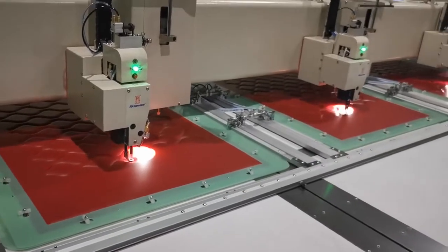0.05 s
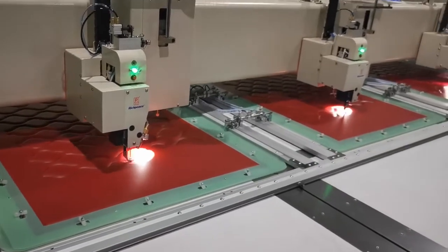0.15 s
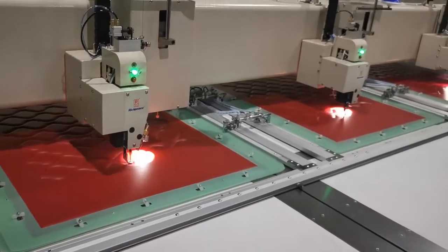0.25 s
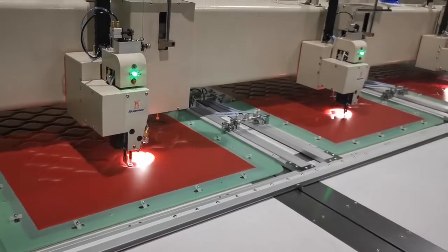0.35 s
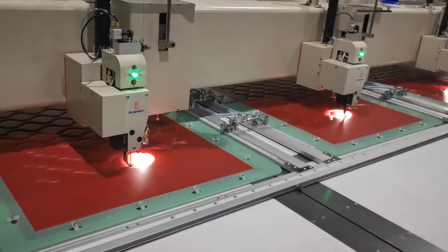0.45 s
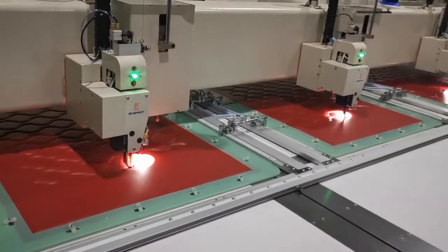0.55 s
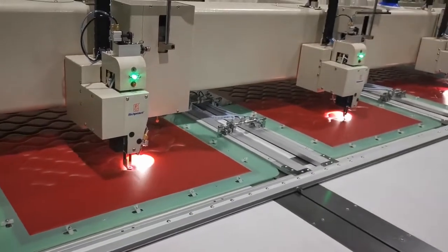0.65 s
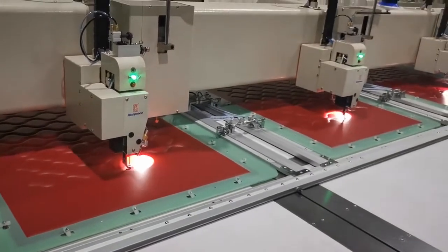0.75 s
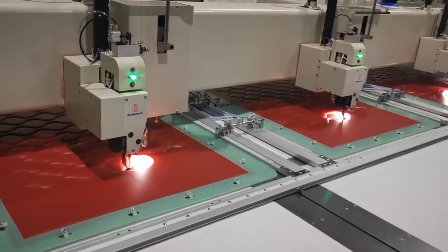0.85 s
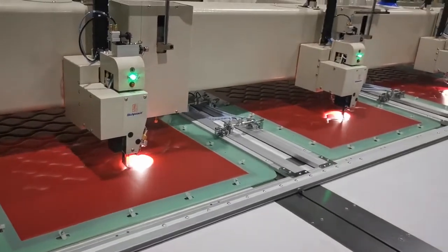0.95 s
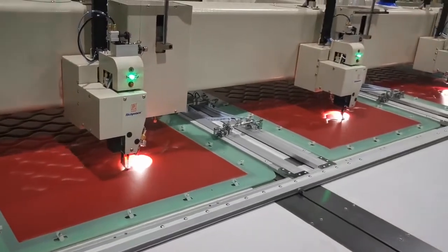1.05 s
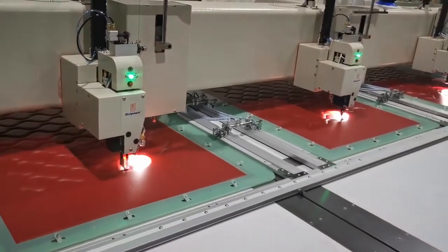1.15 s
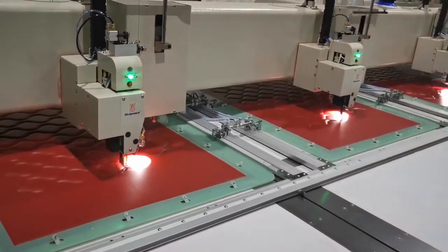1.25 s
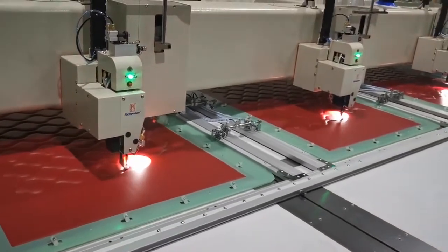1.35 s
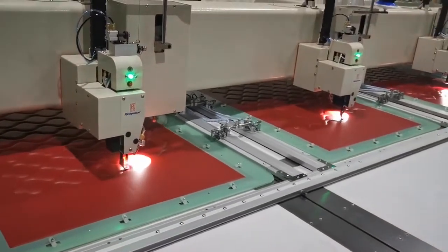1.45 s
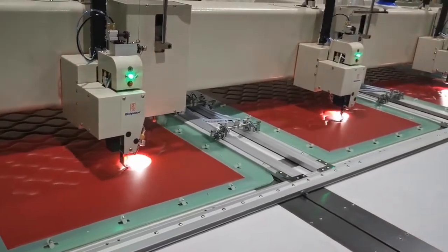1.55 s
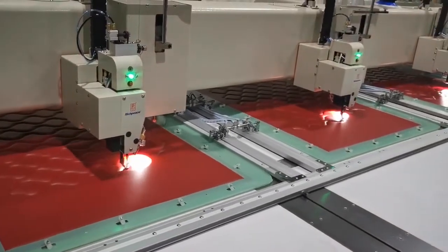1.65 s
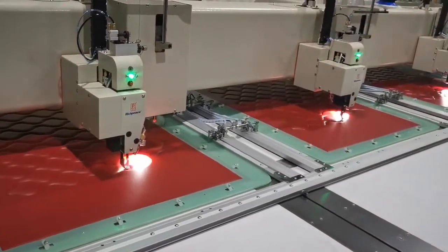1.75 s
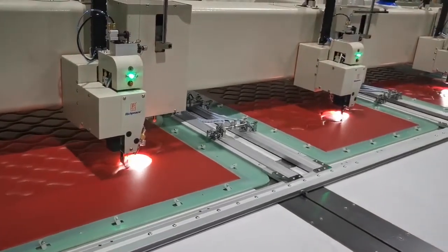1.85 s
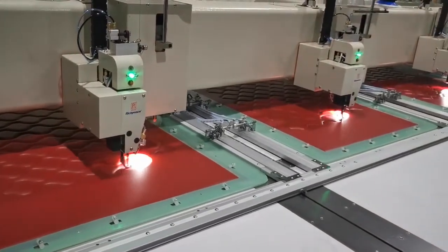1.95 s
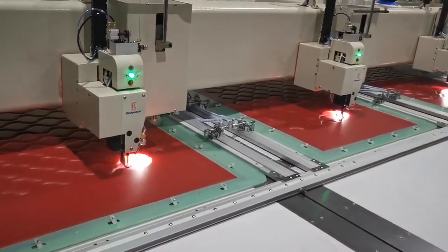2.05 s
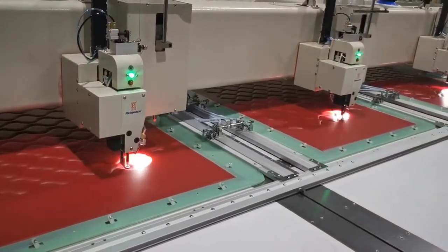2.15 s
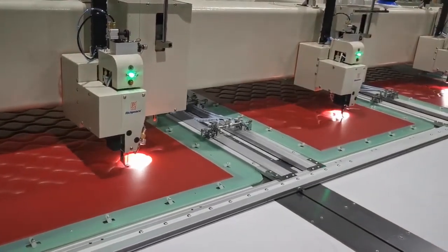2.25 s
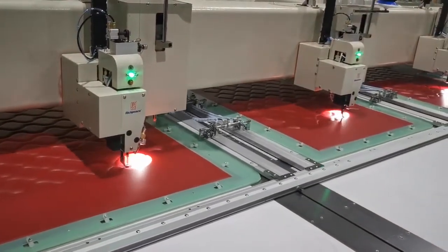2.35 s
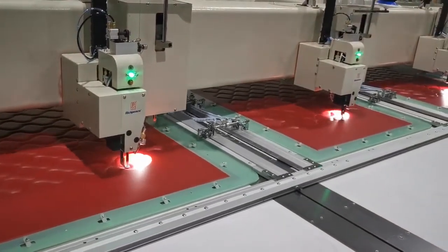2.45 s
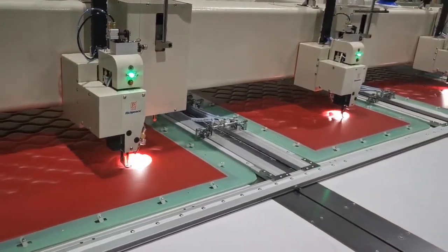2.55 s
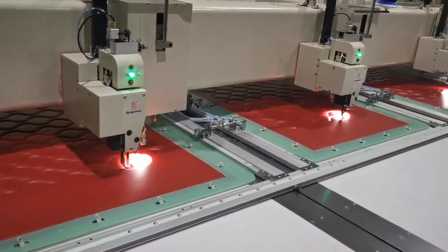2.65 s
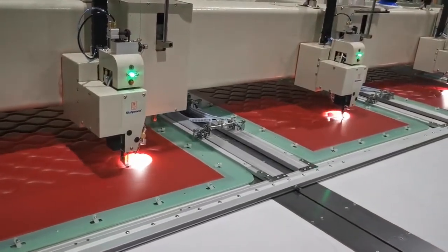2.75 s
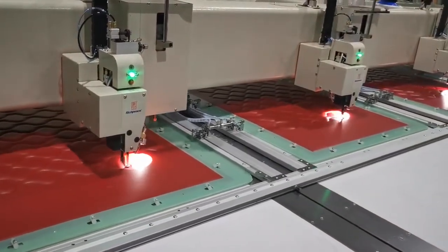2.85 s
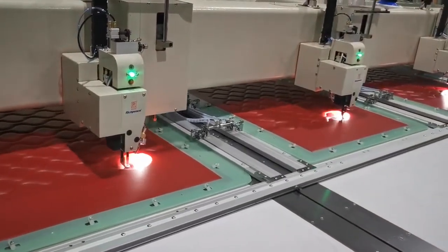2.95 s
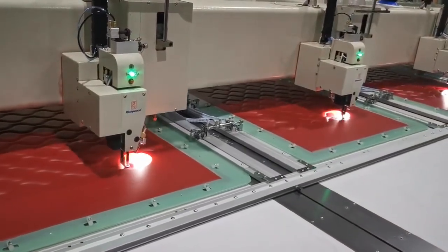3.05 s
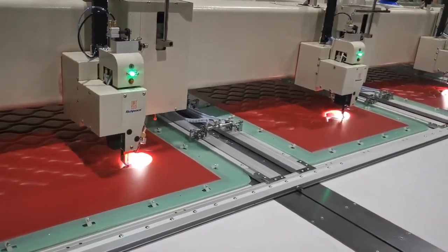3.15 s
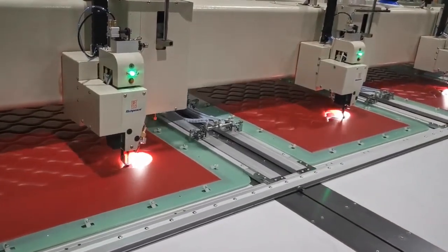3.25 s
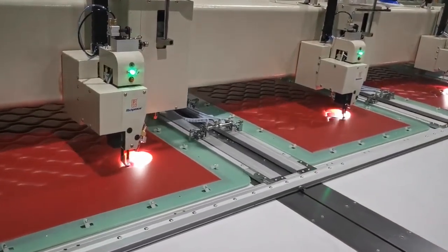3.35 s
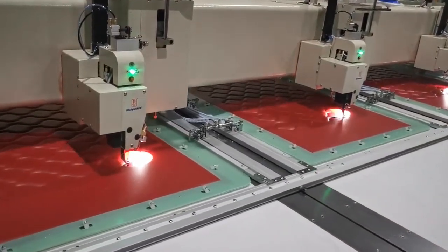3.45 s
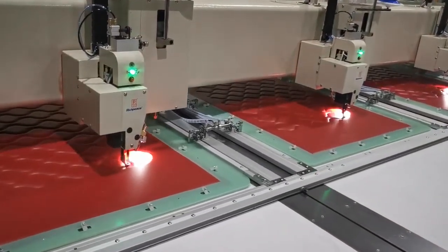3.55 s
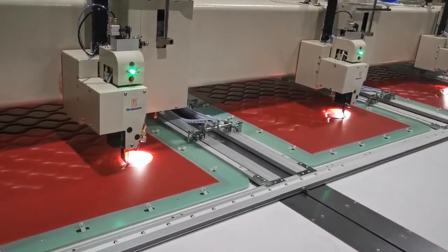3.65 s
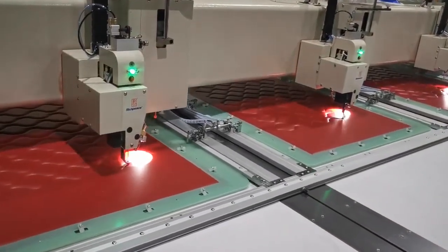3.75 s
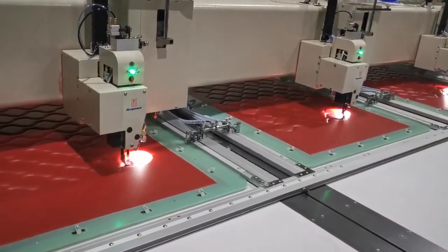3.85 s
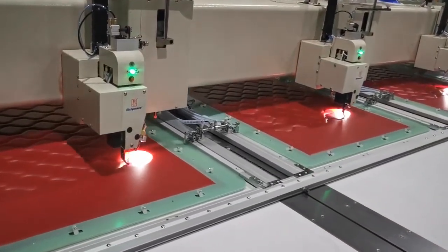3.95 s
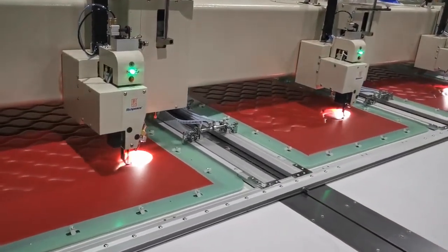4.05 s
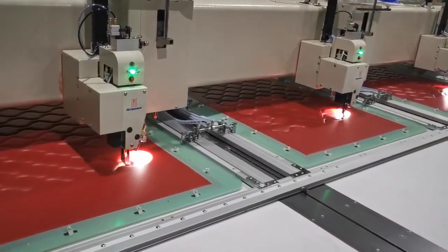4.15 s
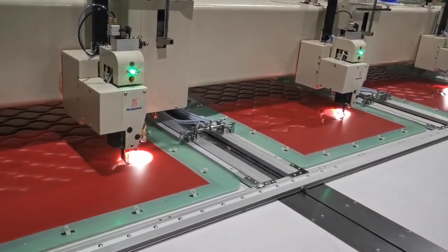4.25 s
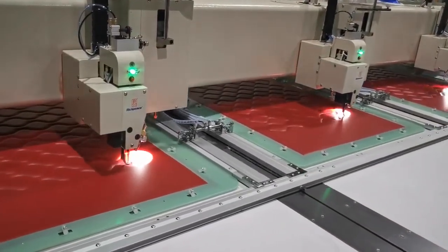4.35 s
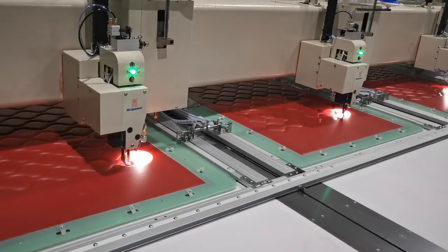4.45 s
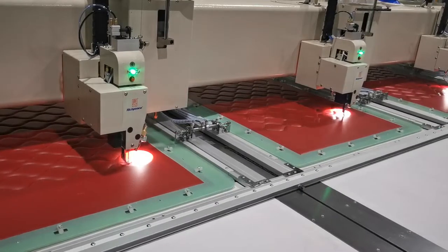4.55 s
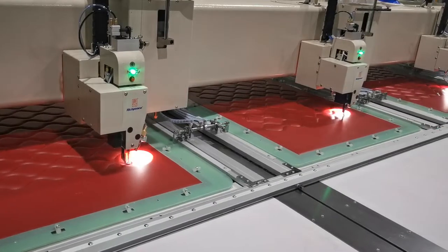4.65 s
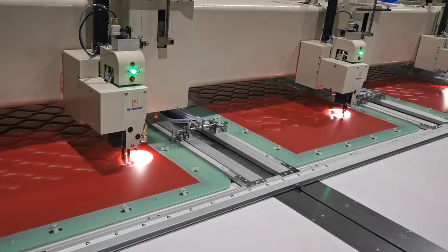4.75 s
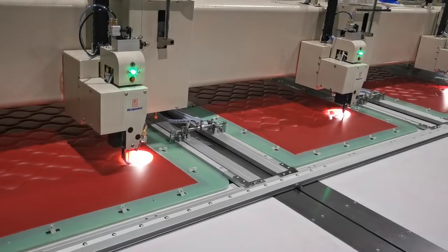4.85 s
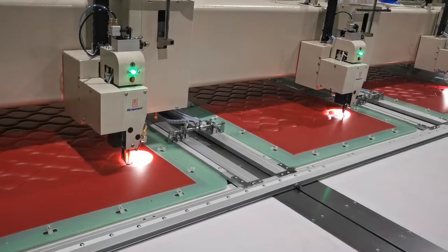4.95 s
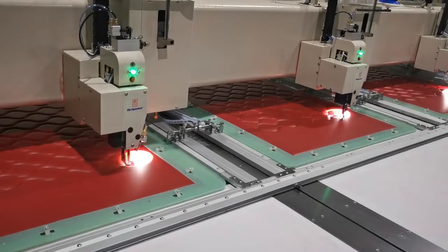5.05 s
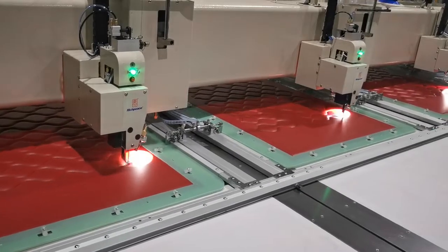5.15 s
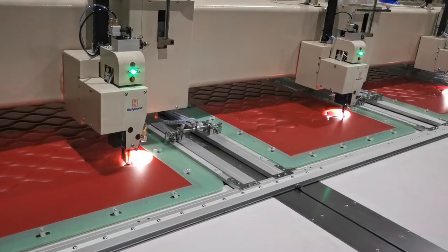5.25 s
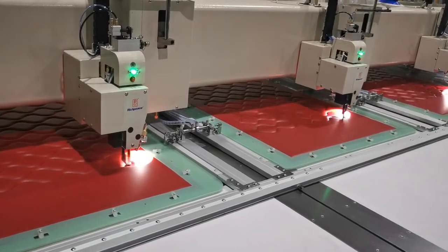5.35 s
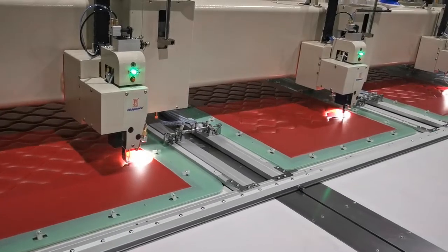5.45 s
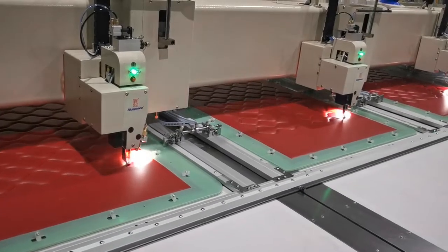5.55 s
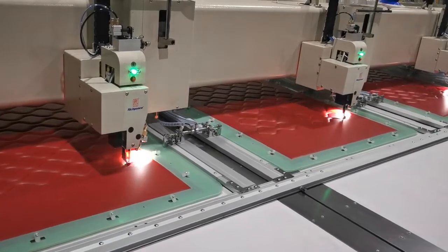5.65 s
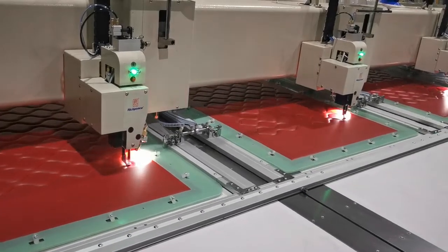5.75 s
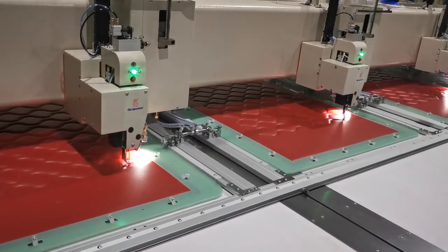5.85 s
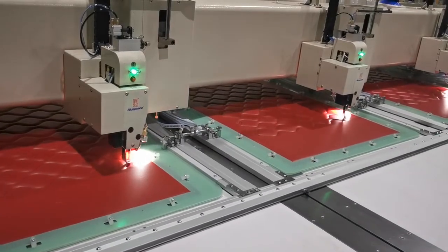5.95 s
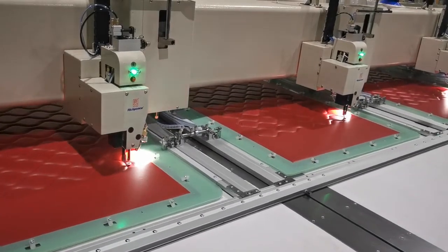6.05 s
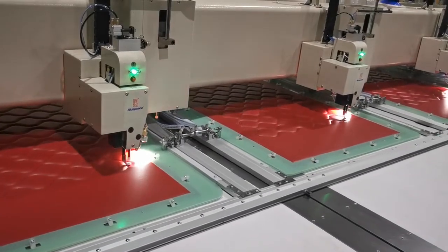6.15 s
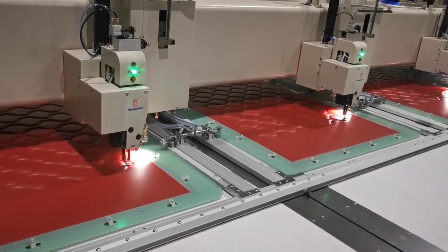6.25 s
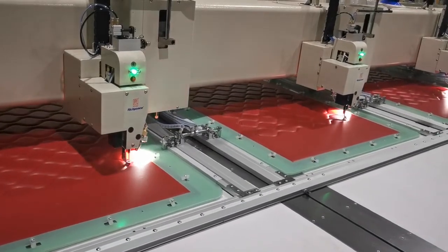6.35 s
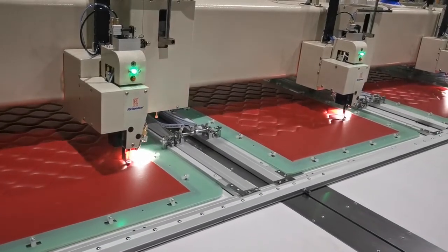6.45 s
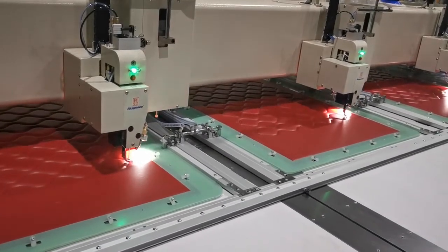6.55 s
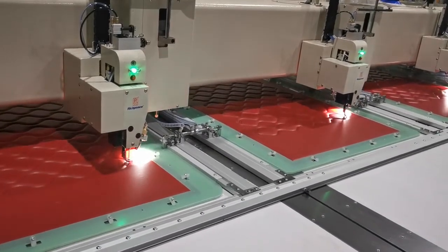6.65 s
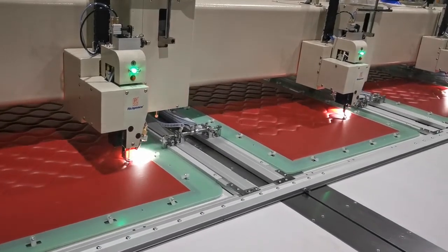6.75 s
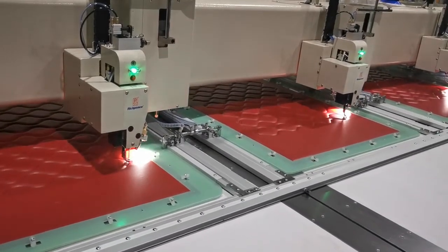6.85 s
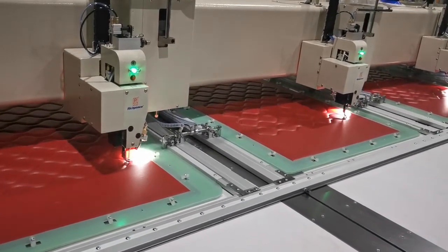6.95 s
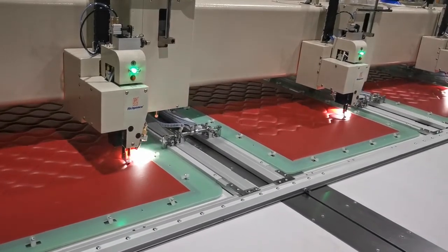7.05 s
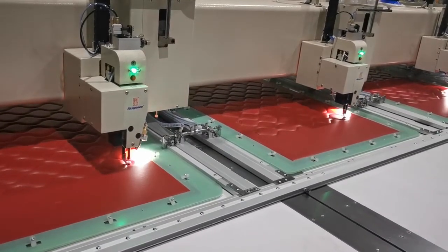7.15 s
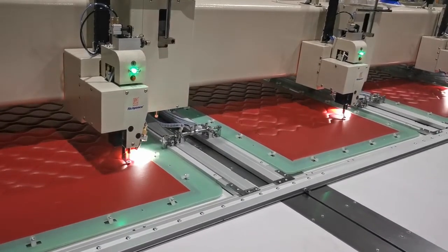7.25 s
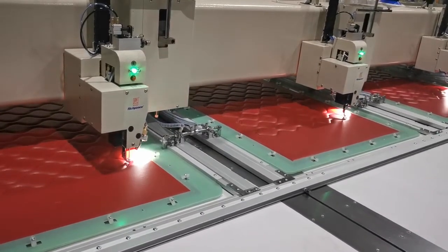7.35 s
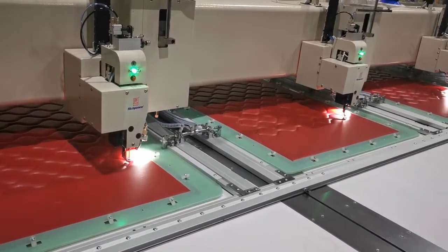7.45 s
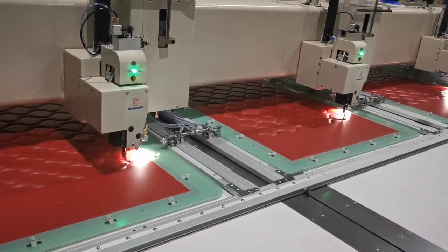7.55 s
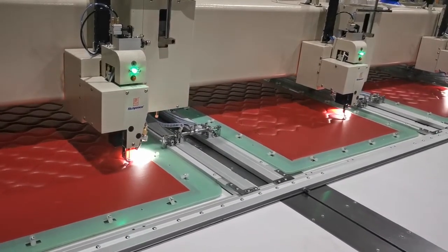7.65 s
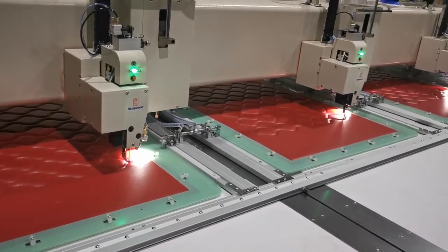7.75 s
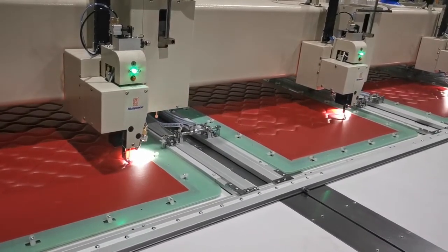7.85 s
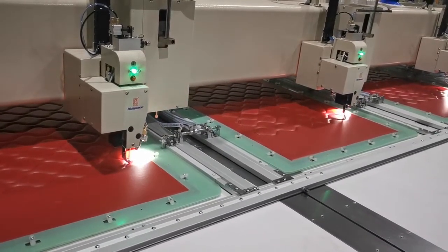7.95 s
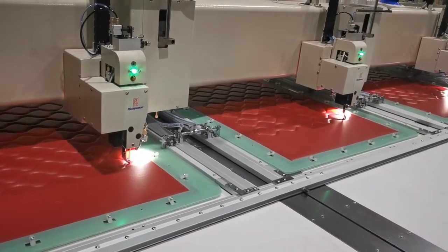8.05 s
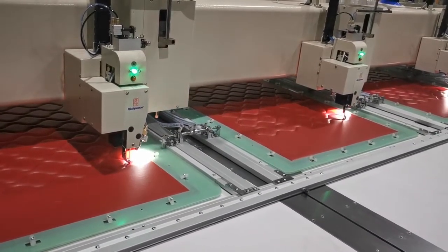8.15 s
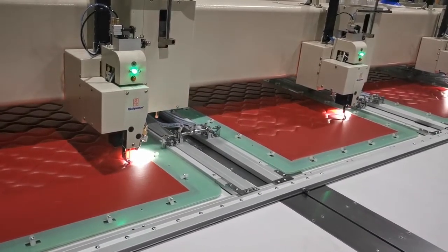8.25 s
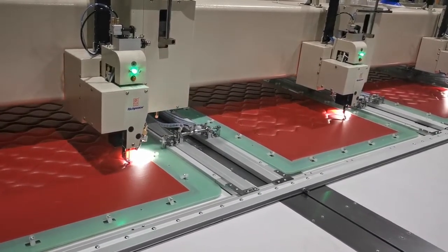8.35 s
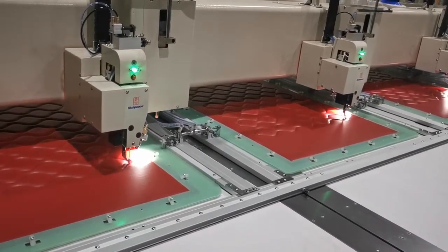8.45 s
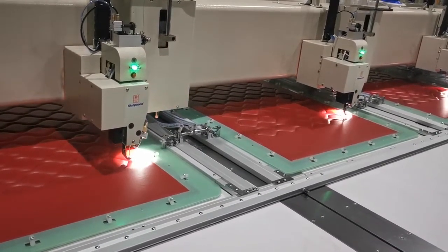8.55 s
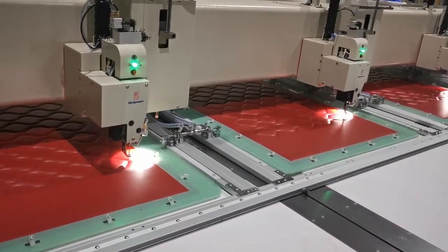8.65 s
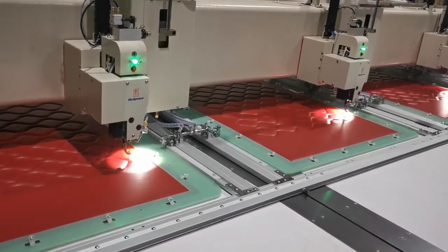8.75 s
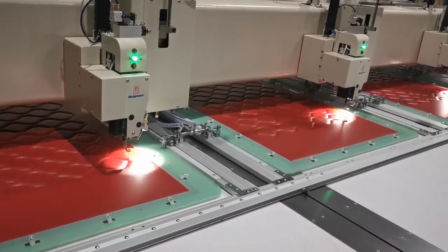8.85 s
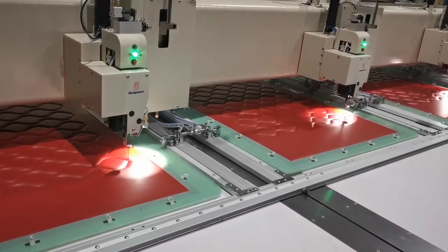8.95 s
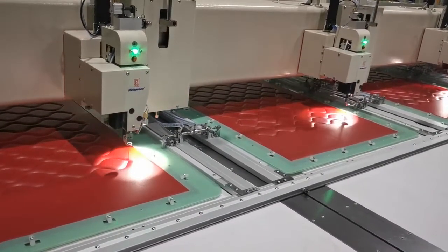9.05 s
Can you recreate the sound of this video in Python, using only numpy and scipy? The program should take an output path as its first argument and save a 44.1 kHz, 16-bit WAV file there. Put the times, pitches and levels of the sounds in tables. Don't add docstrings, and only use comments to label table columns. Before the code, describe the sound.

From 0 to 6.2 seconds, a row of industrial sewing heads runs steadily, roughly thirteen stitches a second. Needle ticks, bars and gears merge into a dense buzzing whir over low rumble, with constant air hiss and a breathy, fluttering high nozzle whistle towards the right. At 6.2 a dull thud and valve puff begin the braking; the whir drops in pitch and judders to rest by 7.2, the frame ringing low. At 6.9 the thread knife snaps brightly with a hard air burst, and the supply hiss bleeds away. Another exhaust sighs around 7.1. A small motor hums at 7.35 to 7.55 and again near 7.75, when exhaust and clamp knocks sound. A sharp exhaust at 8.1 precedes a clattering head lift at 8.25, rattles and overlapping puffs. Air then blows on, fading, over a faint hall murmur. Close stereo microphone, short diffuse echo.

```python
import sys
import numpy as np
from scipy import signal
from scipy.fft import rfft, irfft
from scipy.io import wavfile

SR = 44100
rng = np.random.default_rng(int(sys.argv[2]) if len(sys.argv) > 2 else 0)


def undo_db(level):
    steps = np.asarray(level, float) / 20
    return 10 ** steps


def unload_audio(sound):
    columns = np.transpose(np.atleast_2d(sound))
    steps = np.round(np.clip(columns, -1, 1) * 32767)
    wavfile.write(sys.argv[1], SR, steps.astype(np.int16))


N = 401310
T = np.arange(N) / SR

# multiple of the stitch rate, left level in dB, right
# level in dB.
STRONG_ORDERS = [(3, -48, -48), (4, -51, -50), (5, -39, -39), (7, -52, -52), (8, -52, -52), (9, -54, -52),
                 (12, -51, -50), (13, -54, -53), (16, -47, -47), (17, -46, -47), (18, -44, -42),
                 (19, -41, -42), (20, -41, -42), (21, -38, -37), (22, -42, -41), (23, -42, -43),
                 (24, -51, -48), (25, -41, -42), (26, -25, -24), (27, -39, -40), (28, -35, -34),
                 (29, -47, -46), (32, -50, -49), (33, -49, -51), (34, -51, -47), (36, -46, -43),
                 (37, -50, -44), (39, -54, -43), (42, -51, -47),
                 (49, -47, -50), (50, -53, -48), (51, -47, -53), (52, -53, -52), (53, -52, -46),
               (56, -52, -43), (57, -46, -49), (58, -55, -47), (59, -51, -47), (61, -47, -47),
               (63, -56, -46), (64, -51, -48), (65, -57, -47), (67, -48, -48), (70, -50, -50),
               (73, -49, -45), (75, -42, -44), (76, -38, -39), (77, -46, -40), (80, -46, -51),
               (81, -48, -46), (82, -54, -49), (83, -51, -51), (84, -52, -46), (87, -55, -49),
               (88, -50, -51), (95, -55, -47), (96, -50, -40), (139, -58, -55), (168, -63, -49)]
# frequency in Hz, level above rumble per stitch-rate slot in dB.
WEAK_ORDERS = [(30, 8), (150, 3), (300, -27), (500, -4.5), (1300, 0), (2500, 4.5), (4000, -18)]
# frequency in Hz, width in Hz, level in dB.
FRAME_MODES = [(63, 3.6, -9), (122.7, 3.9, -1.5), (231, 24, -0.5), (284, 26, 1), (348.8, 10.3, 2.5)]
# frequency in Hz, level in dB, T60 in seconds.
NEEDLE_MODES = [(1050, -23.5, .014), (1600, -26, .01), (2300, -28.5, .009), (3300, -34, .006)]
# start in seconds, level in dB, frequency in Hz, T60 in seconds.
KNIFE = (6.9025, -13, 3050, .014)
# frequency in Hz, left level in dB per Hz, right level in dB per Hz.
RUNNING_SPECTRUM = [(25, -78.8, -73), (45, -62, -61.5), (93, -80, -77), (184, -73, -64),
                    (242, -64.5, -59.5), (450, -67.5, -62), (604, -68.5, -67), (1000, -64.5, -63),
                    (1312, -68.5, -67), (1480, -79.5, -73), (2300, -80, -71), (5000, -72.5, -72),
                    (7960, -82.5, -80.5), (11370, -73.5, -81), (15400, -90, -86)]
# frequency in Hz, left level in dB per Hz, right level in dB per Hz.
HALL_SPECTRUM = [(40, -55, -81), (73.4, -50, -73), (120, -85.5, -84), (220, -76, -63), (370, -71, -69.5),
                 (660, -72, -74), (1170, -105, -104), (1740, -108, -100), (2750, -87, -68.5),
                 (4000, -101, -114), (7250, -94, -75), (9250, -103.2, -103.8), (11500, -89, -106.4),
                 (14000, -107.0, -110.1)]
# frequency in Hz, left level in dB per Hz, right level in dB per Hz.
VALVE_SPECTRUM = [(300, -112, -129), (840, -77.5, -80), (1520, -77.5, -73.5), (2270, -70, -64.5),
                  (3100, -70, -66.5), (4800, -69.5, -71.5), (6000, -77.5, -74.5), (7500, -81.5, -72.5),
                  (9000, -78.5, -84), (10800, -76, -89), (13000, -86, -86), (14500, -88, -97)]
# frequency in Hz, left level in dB per Hz, right level in dB per Hz.
SILENCER_SPECTRUM = [(900, -80, -69), (1580, -84, -78), (2300, -75, -68.5), (2800, -71, -66),
                     (3060, -75, -67.5), (3700, -75, -80), (4300, -79, -73.5), (5200, -77, -77),
                     (6270, -82, -73.5), (7530, -89, -87), (9000, -89, -95), (11020, -87, -94),
                     (13000, -92, -94), (14500, -101, -103)]
# frequency in Hz, correlation from -1 to 1.
LIKENESS = [(60, 0.91), (130, 0.96), (290, 0.96), (640, 0.49), (1410, 0.14), (3100, -0.21), (6820, 0.19),
            (15000, -0.13)]
# start in seconds, level in dB, rise in seconds, hold in seconds, T60 in seconds.
PUFFS = [
    (6.208, 5.5, 0.012, .01, .2),
    (6.902, 6.5, 0.001, 0.014, 0.18),
    (7.074, -2, 0.007, 0.026, 0.31),
    (7.622, -18, 0.00093, .003, 0.045),
    (7.805, -4.5, 0.01, 0.014, 0.24),
    (8.266, -2, 0.0064, .04, .3),
    (8.305, 6.5, 0.0032, 0.015, 0.27),
    (8.361, -6.5, 0.0074, 0.086, 0.43),
    (8.455, 2, 0.0028, 0.032, 0.98),
    (8.501, -1, 0.069, 1.5, 2.4),
]
# start in seconds, level in dB, rise in seconds, hold in seconds, T60 in seconds.
EXHAUSTS = [
    (7.11, 0.87, 0.019, 0.029, 0.9),
    (7.69, 0.16, 0.017, 0.067, 0.59),
    (8.12, 1, 0.001, 0.036, 1),
]
# frequency in Hz, level in dB, T60 in seconds.
CLAMP_MODES = [(120, -8, .15), (180, 4, 0.12), (251, -4, 0.15), (302, -4.5, 0.067), (392, -11, 0.13),
               (482, -5, 0.082), (653, -8, .07), (822, -5, .16), (920, -7, 0.06), (1058, -11, 0.13),
               (1303, -13, .09), (1600, -22, .06), (2025, -21, 0.069)]
# frequency in Hz, level in dB, T60 in seconds.
LIFT_MODES = [(212, -14, .06), (269.3, 3.5, 0.11), (394, -4.5, 0.058), (497, -8.5, 0.033),
              (606, -12.5, 0.066), (710, -9, .06), (831, -5, 0.08), (958, -6.5, 0.11), (1163, -7, 0.046),
              (1390, -5, 0.044), (1775, -9, 0.058), (2143, -6.5, 0.055), (2420, -22, .04)]
# frequency in Hz, level in dB, T60 in seconds.
BASE_MODES = [(69.4, 5, 0.058), (115, 1, 0.18), (212, -4.5, 0.14), (364, -26, 0.046)]
# start in seconds, level in dB, strike spread in seconds, tilt in dB per octave.
CLAMP_KNOCKS = [
    (6.918, -38, 0.039, 6.5),
    (7.7925, -25.5, 0.035, 2.5),
    (6.212, -32.5, 0.032, 11),
]
# start in seconds, level in dB, strike spread in seconds, tilt in dB per octave.
LIFT_KNOCKS = [
    (8.252, -36, .012, 4.5),
    (8.2645, -19, 0.035, 2.5),
    (8.294, -30, 0.008, -4),
    (8.335, -35, 0.0068, 3),
    (8.38, -39, 0.012, -12),
    (8.41, -37, 0.012, -16),
    (8.456, -31.5, 0.012, -2),
]
# start in seconds, level in dB, strike spread in seconds, tilt in dB per octave.
THUDS = [
    (6.2, -34, 0.2, 5),
    (6.9, -37, 0.003, 2.5),
    (6.975, -49, 0.036, -5),
    (7.065, -37.5, .1, -10),
    (7.69, -47, 0.025, -7),
    (8.107, -42, 0.029, -4),
    (8.31, -40, 0.16, -12),
    (8.47, -40, 0.056, 4),
]
# time in seconds, pitch in Hz, level in dB.
FEED = [
    (7.3, 222, -74),
    (7.35, 224.5, -39),
    (7.5, 218.7, -41),
    (7.6, 220, -54),
    (7.75, 220, -43),
    (7.8, 220, -66),
]
# time in seconds, share of full speed.
BRAKING = [
    (6.295, 1),
    (6.37, .8),
    (6.6, .4),
    (6.75, .22),
    (7, .1),
    (7.2, .05),
]
# start in seconds, level in dB, rise in seconds, hold in seconds, T60 in seconds.
SHAKES = [
    (6.265, -29.5, 0.091, 0.2, 1.25),
    (7.05, -43.5, 0.12, 0.85, 1.5),
    (8.247, -54, 0.15, .02, .45),
]
# time in seconds, level in dB.
PRESSURE = [
    (0, -.5),
    (5, 0),
    (5.8, 0.5),
    (6.2, 0),
    (6.9, -1),
    (6.97, -5),
    (7.25, -11),
    (7.6, -27.5),
    (7.9, -40),
]

STITCH_HZ = 13.333
STROKE_TURNS = .22
GEAR_DB, GEAR_DB_PER_DECADE = 0, 85
RUMBLE_DB, RUMBLE_DB_PER_DECADE = 3.5, 26
IDLE_DB, IDLE_END_S, IDLE_T60_S = -17.5, 8.5, .8
JUDDER_DB = 14
JET_DB, JET_HZ, JET_DB_PER_PRESSURE_DB = -33, 6640, 0.95
GUST_DB, GUST_HZ = 1.02, 39.5
HISS_DB, HISS_DB_PER_PRESSURE_DB = -1, 1
PUFF_TILT_DB_PER_OCTAVE, EXHAUST_TILT_DB_PER_OCTAVE = 3.5, 3.3


def curve(rows):
    time_s, *columns = np.transpose(rows)
    return [np.interp(T, time_s, c) for c in columns]


def read(points, hz):
    point_hz, *columns = np.transpose(points)
    return np.array([np.interp(np.log(hz + 1), np.log(point_hz), c) for c in columns])


def pair(a, b, hz):
    same = np.clip(read(LIKENESS, hz)[0], -1, 1)
    return np.array([a, same * a + np.sqrt(1 - same ** 2) * b])


def noise(spectrum, tilt_db=0., shape=lambda hz: 1, size=N):
    hz = np.fft.rfftfreq(size, 1 / SR)
    level_db = read(spectrum, hz) + tilt_db * np.log2((hz + 1) / 5000)
    gain = undo_db(level_db) * shape(hz)
    white = rfft(rng.standard_normal((2, size)))
    return irfft(pair(*white, hz) * gain * np.sqrt(SR / 2), size)


def slow(hz):
    knots_s = np.arange(0, N / SR + 1, .5 / hz)
    return np.interp(T, knots_s, rng.standard_normal(len(knots_s))) * 0.83


def resonate(x, hz, width_hz):
    turn = np.exp(2j * np.pi * np.cumsum(hz * np.ones(x.shape[-1])) / SR)
    r = np.exp(-np.pi * width_hz / SR)
    return 2 * (turn * signal.lfilter([1 - r], [1, -r], x / turn)).real


def burst(t, db, rise_s, hold_s, t60_s):
    decay_db = 60 * np.maximum(t - rise_s - hold_s, 0) / t60_s
    return np.clip(t / rise_s, 0, 1) * undo_db(db - decay_db)


def hall_floor():
    return undo_db(-12.5 + slow(9.4)) * noise(HALL_SPECTRUM)


def hall_echo(x):
    t = T[:SR // 2]
    low = signal.lfilter([.12], [1, -.88], rng.standard_normal((2, len(t))))
    bright = .15 * rng.standard_normal((2, len(t)))
    tail = low * undo_db(-60 * t / .8) + bright * undo_db(-60 * t / .45)
    tail *= np.minimum(t / 0.0032, 1)
    tail = irfft(pair(*rfft(tail), np.fft.rfftfreq(len(t), 1 / SR)))
    return signal.fftconvolve(x, tail / np.linalg.norm(tail[0]), axes=1)[:, :N]


def air_supply():
    hiss = noise(RUNNING_SPECTRUM, shape=lambda f: 1 / np.sqrt(1 + (2100 / (f + 1)) ** 10))
    pressure_db = curve(PRESSURE)[0]
    flow, gust = rng.standard_normal((2, N)), slow(9)
    hz = JET_HZ + GUST_HZ * gust
    jet = resonate(resonate(flow, hz, 840), hz, 1040)
    jet_db = JET_DB + JET_DB_PER_PRESSURE_DB * pressure_db + GUST_DB * gust
    jet *= undo_db(jet_db + [[-6], [5]]) / jet.std()
    hiss_db = HISS_DB + HISS_DB_PER_PRESSURE_DB * pressure_db + 0.83 * slow(7.7)
    return undo_db(hiss_db) * hiss + jet


def feed_motor():
    hz, db = curve(FEED)
    angle = 2 * np.pi * np.cumsum(hz) / SR
    hum = np.sin(angle) + 0.41 * np.sin(1.5 * angle) + 0.25 * np.sin(2 * angle)
    return undo_db(db + 1.6 * slow(24)) * hum


def valves(rows, spectrum, tilt_db):
    out = np.zeros((2, N))
    for start_s, *shape in rows:
        part = out[:, round(start_s * SR):][:, :32768]
        t = T[:part.shape[1]]
        part += burst(t, *shape) * noise(spectrum, tilt_db, size=32768)[:, :len(t)]
    return out


def knocks(rows, modes):
    out, t = np.zeros((2, N)), T[:8192]
    size = 2 * len(t)
    for start_s, db, spread_s, tilt_db in rows:
        struck = rng.random(len(t)) < 2500 / SR
        blows = rng.standard_normal((2, len(t))) * struck * np.exp(-(t / spread_s) ** 2)
        blows[:, 0] = 4
        blows = pair(*rfft(blows, size), np.fft.rfftfreq(size, 1 / SR))
        sound = 0
        for hz, mode_db, t60_s in modes:
            detune = 1 + .035 * rng.standard_normal((5, 1))
            detune = detune - detune.mean() + 1
            phase_turns = rng.random((5, 1))
            ring = np.sin(2 * np.pi * (hz * detune * t + phase_turns)).sum(0)
            ring *= undo_db(-60 * t / min(t60_s, .16))
            ring *= np.minimum(t / .0015, 1) ** 2
            rung = irfft(blows * rfft(ring, size))
            sound = sound + undo_db(mode_db + tilt_db * np.log2(hz / 400)) * rung / rung.std()
        strike_rms = sound[:, :round((spread_s + .02) * SR)].std()
        out[:, round(start_s * SR):][:, :size] += undo_db(db) * sound / strike_rms
    return out


def thread_knife():
    start_s, db, hz, t60_s = KNIFE
    t = np.maximum(T - start_s, 0)
    return undo_db(db - 60 * t / t60_s) * np.sin(2 * np.pi * hz * t) * np.minimum(t / 0.0031, 1)


def needle(turns):
    at = np.diff(np.floor(turns - .347), prepend=-1) > 0
    punch = at * undo_db(3.2 * rng.standard_normal(N))
    t = T[:600]
    tick = sum(undo_db(db - 60 * t / t60_s) * np.sin(2 * np.pi * (hz * t + rng.random()))
               for hz, db, t60_s in NEEDLE_MODES)
    tick *= np.minimum(t / .001, 1)
    return signal.oaconvolve(punch, tick)[:N] * undo_db([[-4], [2.5]])


def play_orders(levels_db, turns, size=8192):
    order = np.arange(levels_db.shape[1])
    phase, side = rng.random((2, len(order)))
    bars = np.arange(16, 29)
    phase[bars] = .4 * phase[bars] * (bars < 26) - bars * STROKE_TURNS
    phase[25] = .4 - 25 * STROKE_TURNS
    likeness = np.clip(read(LIKENESS, order * STITCH_HZ)[0], -1, 1)
    apart = np.arccos(likeness) * np.sign(side - .5)
    spectrum = undo_db(levels_db) * np.exp(1j * (2 * np.pi * phase + np.outer([0, 1], apart)))
    turn = irfft(spectrum, size) * size / np.sqrt(2)
    return np.array([np.interp(turns % 1, np.arange(size) / size, c, period=1) for c in turn])


def order_levels():
    hz = np.arange(300) * STITCH_HZ
    weak_db = read(RUNNING_SPECTRUM, hz) + read(WEAK_ORDERS, hz) + 10 * np.log10(STITCH_HZ)
    weak_db += np.minimum(5 * rng.standard_normal(len(hz)), 4)
    strong_db = np.full(weak_db.shape, -200.)
    for order, *db in STRONG_ORDERS:
        strong_db[:, order], weak_db[:, order] = db, -200
    weak_db[:, :2] = -200
    return strong_db, weak_db


def frame_ring():
    shaken = sum(burst(T - start_s, *shape) for start_s, *shape in SHAKES)
    shake = rng.standard_normal(N)
    ring = sum(undo_db(db) * resonate(shake, hz, width_hz) for hz, width_hz, db in FRAME_MODES)
    return shaken * ring / ring.std()


def drive():
    speed = np.clip(curve(BRAKING)[0], .01, 1)
    decades = np.log10(speed)
    turns = np.cumsum(np.where(T < 6.2, 1, speed)) * STITCH_HZ / SR
    gear_db = GEAR_DB + GEAR_DB_PER_DECADE * decades
    gear_db = gear_db + JUDDER_DB * (1 - speed) * np.cos(2 * np.pi * (turns + 0.65))
    idle_db = IDLE_DB - 60 * np.maximum(T - IDLE_END_S, 0) / IDLE_T60_S
    rumble_db = RUMBLE_DB + RUMBLE_DB_PER_DECADE * decades - 60 * (T > BRAKING[-1][0])
    rumble_db = np.maximum(rumble_db, idle_db)
    strong_db, weak_db = order_levels()
    strong = play_orders(strong_db, turns)
    strong = strong + undo_db(-20) * slow(4) * play_orders(strong_db, turns)
    weak = play_orders(weak_db, turns)
    rumble = noise(RUNNING_SPECTRUM, shape=lambda f: 1 / np.sqrt(1 + (f / 2100) ** 10))
    beat = 1 + .15 * np.cos(4 * np.pi * turns)
    orders = undo_db(gear_db) * strong + undo_db(0.16 * gear_db) * weak
    rumble = undo_db(rumble_db + .5 * slow(5)) * beat * rumble
    return orders + rumble + frame_ring() + undo_db(.5 * gear_db) * needle(turns)


def scene():
    hits = knocks(CLAMP_KNOCKS, CLAMP_MODES) + knocks(LIFT_KNOCKS, LIFT_MODES)
    hits = hits + knocks(THUDS, BASE_MODES) + thread_knife()
    air = valves(PUFFS, VALVE_SPECTRUM, PUFF_TILT_DB_PER_OCTAVE)
    air = air + valves(EXHAUSTS, SILENCER_SPECTRUM, EXHAUST_TILT_DB_PER_OCTAVE)
    echo = undo_db(-12) * hall_echo(hits) + undo_db(-7.0) * hall_echo(air)
    return hall_floor() + echo + air_supply() + feed_motor() + air + hits + drive()


def band_limit(x):
    return signal.sosfilt(signal.butter(12, 15730, fs=SR, output="sos"), x)


def record(dry):
    bass_cut = signal.butter(5, 38, "high", fs=SR, output="sos")
    side_cut = signal.butter(1, 200, "high", fs=SR, output="sos")
    top_cut = signal.butter(8, 15300, fs=SR, output="sos")
    mid = signal.sosfilt(bass_cut, dry.mean(0))
    side = signal.sosfiltfilt(side_cut, (dry[0] - dry[1]) / 2)
    ports = signal.sosfilt(top_cut, [mid + side, mid - side])
    return band_limit(ports)


dry = scene()
out = record(dry)
unload_audio(out)
```